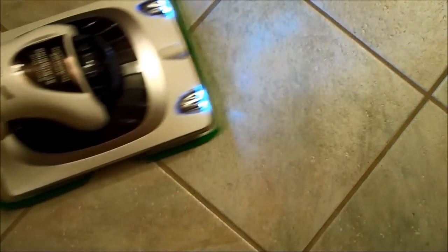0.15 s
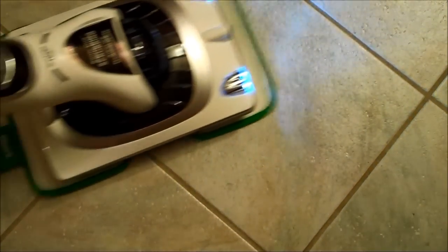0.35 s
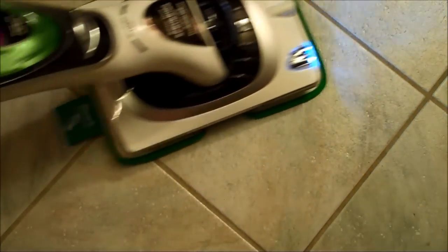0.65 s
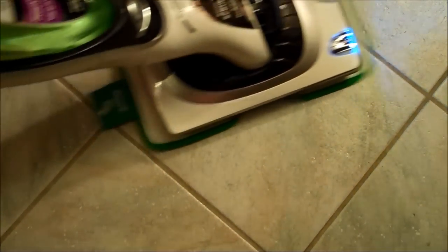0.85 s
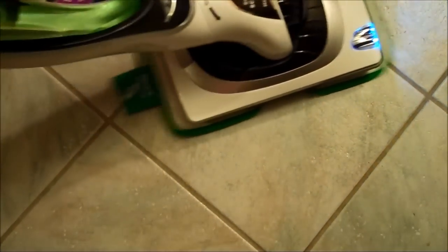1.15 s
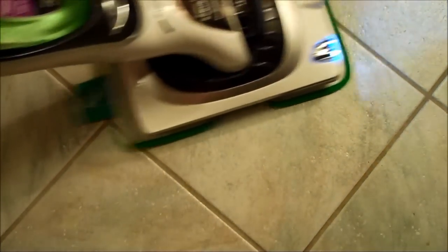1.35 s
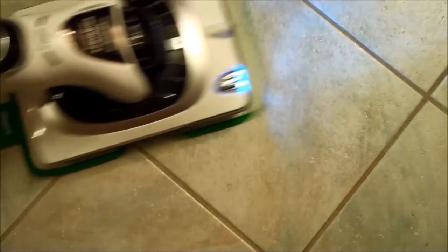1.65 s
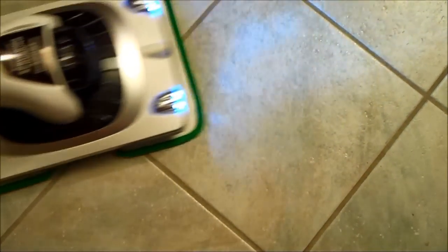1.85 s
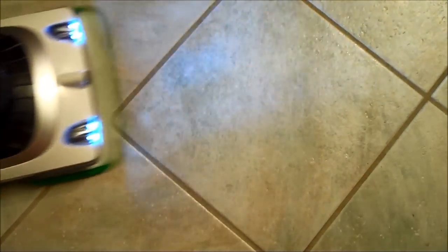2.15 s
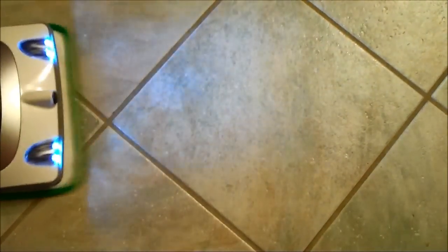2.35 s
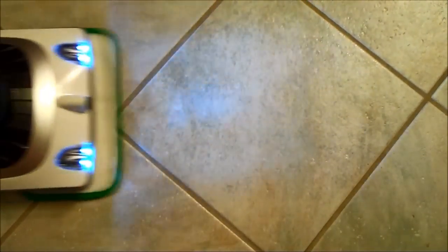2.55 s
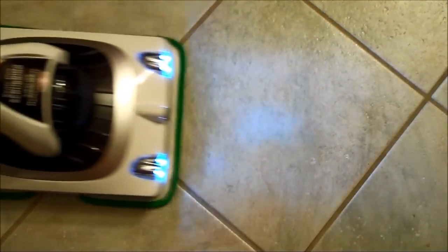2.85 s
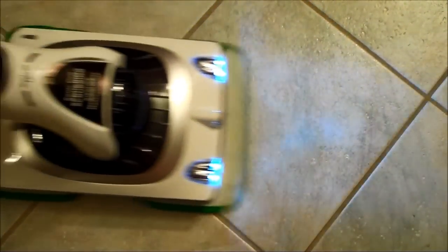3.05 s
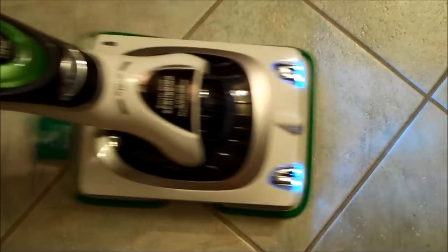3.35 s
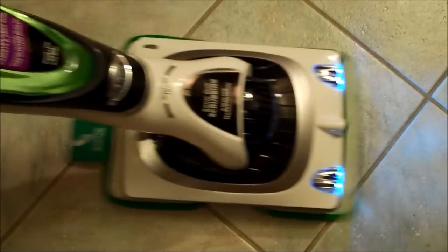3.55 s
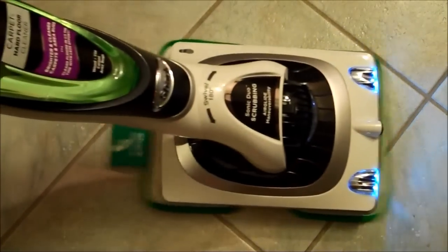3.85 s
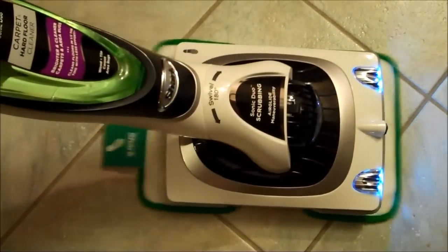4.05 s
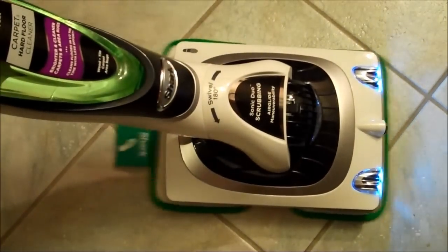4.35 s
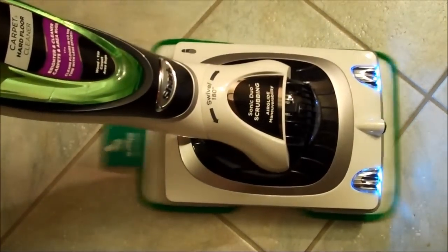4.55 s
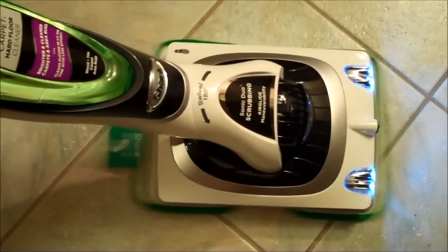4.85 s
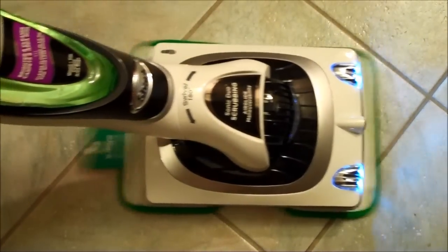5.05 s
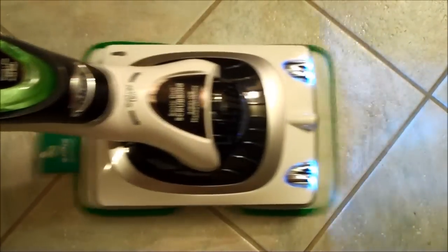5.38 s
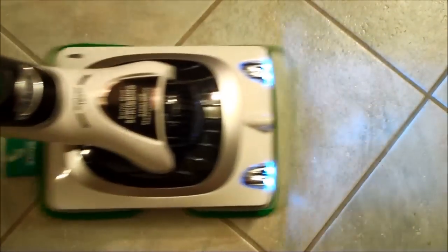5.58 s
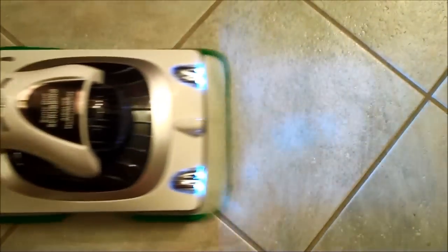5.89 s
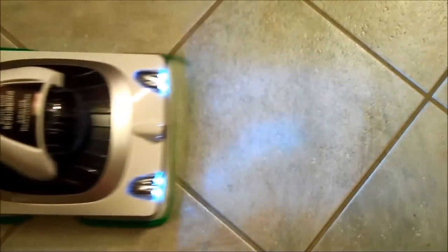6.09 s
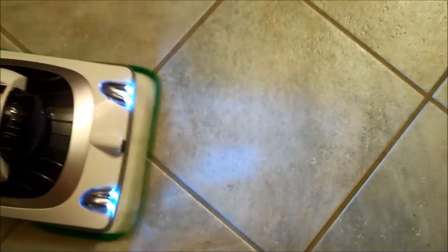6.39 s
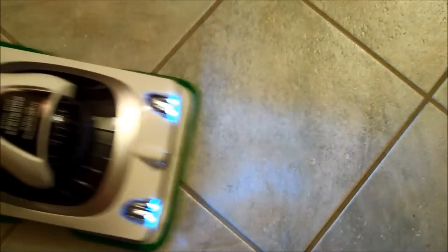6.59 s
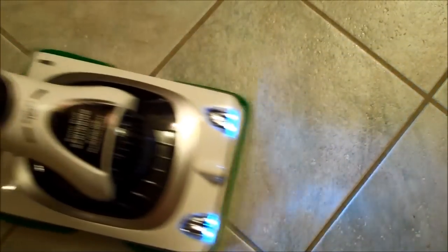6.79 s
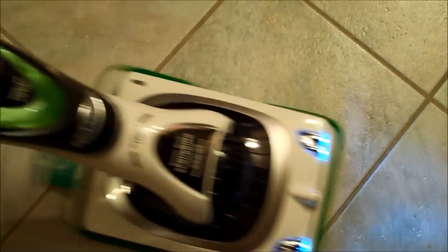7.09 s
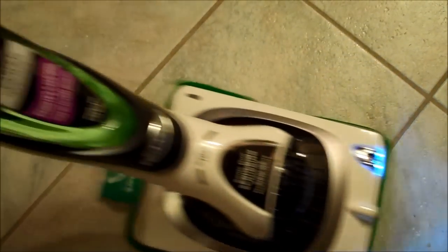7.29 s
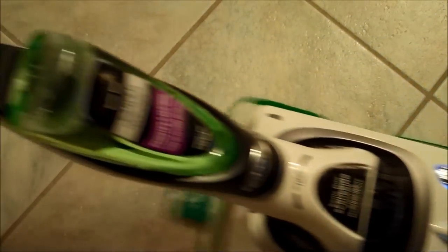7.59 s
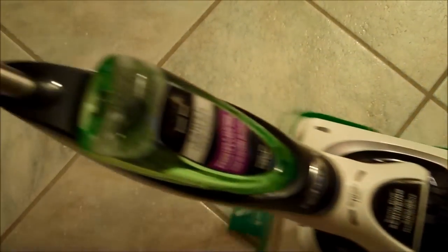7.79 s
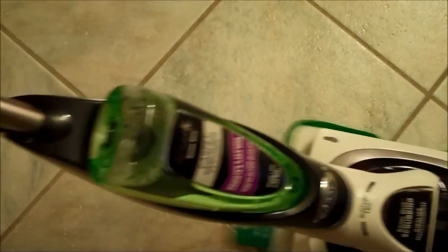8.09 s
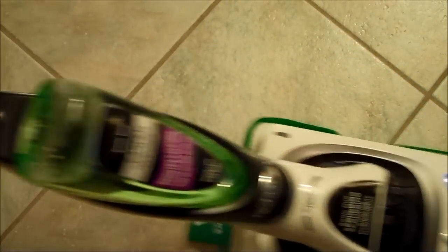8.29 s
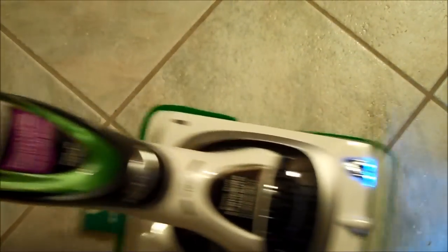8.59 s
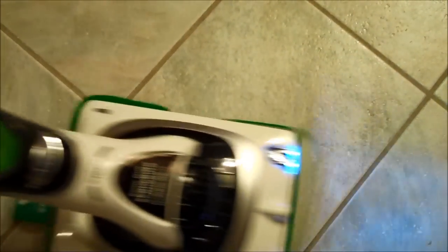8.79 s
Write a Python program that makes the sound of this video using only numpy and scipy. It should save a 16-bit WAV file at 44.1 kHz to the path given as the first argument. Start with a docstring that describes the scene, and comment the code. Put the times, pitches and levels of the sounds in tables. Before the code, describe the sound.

Close up in a reverberant tiled room, an electric scrubber buzzes with a wavering whine around 1.1 kilohertz, over rough friction and thin motor hiss. After a click it glides up to about 1.5 kilohertz, purer and more piercing, pulsing faster, and continues to the end with uneven loudness. A couple of tiny plastic ticks follow.

```python
"""A gear whine is heard first, warbling at the stroke rate above the rub of pads on tiles in a hard room.
A hard-floor scrubber drives two shuttling pads through gear and crank, and each stroke brakes its motor.
A button clicks and the motor spins up to its faster setting. The whine is a tooth tone with harmonics;
rub and motor hiss are coloured noise, clicks are decaying bursts, and late on a faint hum enters."""
import sys
import numpy as np
from scipy import signal
from scipy.fft import rfft, irfft, next_fast_len
from scipy.io import wavfile
from scipy.ndimage import uniform_filter1d, map_coordinates

SR = 44100
rng = np.random.default_rng(int(sys.argv[2]) if len(sys.argv) > 2 else 0)


def store_wav(level_fs):
    """Save 16-bit WAV to argv[1]."""
    pcm = np.round(np.clip(np.atleast_2d(level_fs), -1, 1) * 32767)
    wavfile.write(sys.argv[1], SR, pcm.T.astype(np.int16))


N = 393813
TIME_S = np.arange(N) / SR

# Motor speed, sagging under load and rising after the button.
# Each row: time in seconds, tooth rate in Hz before the swing of each stroke.
MOTOR_SPEED = [(0.0, 1098.8), (0.7, 1110.3), (1.2, 1098.6), (1.7, 1141.7), (2.3, 1115.4), (2.7, 1063.1),
               (3.0, 1118.2), (4.1, 1102.6), (4.55, 1098.4), (4.75, 1276.3), (5.0, 1484.1), (5.15, 1503.2),
               (6.05, 1514.4), (6.65, 1479.7), (7.2, 1498.7), (8.0, 1488.2), (8.4, 1500.5), (8.93, 1518.2)]
# Level of the whine as the machine moves through the room. Each row: time in seconds, tooth tone in dB,
# tooth tone at top speed in dB, tooth tone while braking in dB, octave in dB.
WHINE_LEVELS = [(0, -33, -37, -35, -33), (.4, -33, -28, -29.5, -35), (.7, -29.5, -27, -28, -36.5),
                (1.2, -30, -30, -31, -35), (1.7, -30, -24.5, -36.5, -36), (2.1, -33, -28.5, -31, -32),
                (2.65, -35.5, -33.5, -42, -33.5), (3.2, -32.5, -32, -30, -35),
                (3.7, -30.5, -28.5, -29.5, -33), (4.5, -31.5, -33, -29, -32.5), (4.8, -24.5, -20, -22, -40),
                (5.15, -22.5, -32, -19.5, -37.5), (5.55, -24, -54, -25, -38.5),
                (5.85, -21.5, -30, -26.5, -37.5), (6.4, -30, -31, -37, -41), (6.8, -27, -29, -38, -40),
                (7.05, -22.5, -41, -33, -38.5), (7.3, -28.5, -24, -23, -39),
                (7.8, -22.5, -28.5, -24.5, -36.5), (8.3, -29.5, -27, -24, -36.5),
                (8.55, -22, -37.5, -22.5, -38), (8.8, -25, -18.5, -26, -35),
                (8.93, -26.5, -24, -36.5, -38.5)]
# Tooth tone late in a stroke, relative to its level; rows: bottom speed, recovery.
# Each row: offset at the slow setting in dB, at the fast setting in dB.
TONE_OFFSETS = [(0.1, -1.5), (0.098, 0.5)]
# Octave through a stroke, relative to its level; rows: top speed, braking, bottom speed, recovery.
# Each row: offset at the slow setting in dB, at the fast setting in dB.
OCTAVE_OFFSETS = [(-3.7, -0.9), (-2, -1), (-9, -4), (-8, -1.4)]
# Upper gear orders, before the housing. Each row: multiple of the tooth rate, level at the slow setting
# in dB, level at the fast setting in dB, roughness from 0 to 1.
UPPER_ORDERS = [(3, -49, -54, .85), (4, -58, -51, 1), (5, -58, -58, .8), (6, -55, -51, .7),
                (8, -56, -50, .7), (10, -54, -63, .8)]
# What the housing passes of the upper orders. Each row: frequency in Hz, gain in dB.
HOUSING_GAIN = [(2800, -6), (3050, 3.5), (3250, -0.5), (3500, 1.5), (3750, 7.5), (4000, 7), (4330, 4),
                (4700, -4), (5100, -16), (9000, -11.5), (9450, -13), (10000, -15), (11600, -13),
                (14000, -18)]
# Housing panels that ring on as the whine sweeps through them.
# Each row: resonance in Hz, width in Hz, gain at resonance in dB.
PANEL_MODES = [(1008, 5, -20), (1179, 8.5, -1.5), (2039, 23, -2.5), (2405, 36, 5.5), (3494, 120, -4)]
# Colour of pad scrub and gear rattle. Each row: frequency in Hz, relative level in dB per Hz.
RUB_COLOUR = [(20, -30), (50, -28.5), (105, -32), (135, -23), (300, -15.5), (345, -5.5), (420, -2.5),
              (700, -1), (1150, -2), (1700, -5), (2700, -13.5), (3800, -13.5), (4600, -24), (5200, -29),
              (8000, -77)]
# Resonances of housing and room under the scrub. Each row: frequency in Hz, width in Hz,
# boost at the slow setting in dB, boost at the fast setting in dB (negative for a dip).
RUB_MODES = [(128.6, 6.5, 2, 3), (181, 14, 7.5, 7.5), (249, 26, 9.5, 2), (328, 36, -4.5, -6.5),
             (359.7, 23, 7, 2.5), (383.4, 32, 6, 5.5), (449, 19.3, -6.5, -19), (464, 28, 4.5, 3),
             (592.2, 21, -11.5, -2.5), (615, 34, 9, 6), (799, 17, -5, -9.5), (1301, 74, 10.5, 13),
             (2370, 72, 3, 6), (3381, 50, 10.5, 7), (3823, 68, 6.5, 7), (4260, 160, 0, 5.5),
             (9450, 80, 4, 6.5)]
# Colour of motor brushes and cooling air. Each row: frequency in Hz, relative level in dB per Hz.
HISS_COLOUR = [(1500, -29), (4000, -2.5), (6000, 1), (8500, -1.5), (10200, -4), (11600, 0), (12800, -6),
               (13500, -8), (14000, -28)]
# Plastic clicks of button and handle. Each row: time in seconds, gain in dB,
# decay time of the slower noise (60 dB) in seconds, band centre in Hz.
PLASTIC_CLICKS = [(.377, -38, .02, 8000), (4.3625, -29, .07, 7500), (5.965, -45, .02, 8000),
                  (5.9712, -35, .04, 9000)]
# Ringing modes in every click. Each row: frequency in Hz, relative level in dB, 60 dB decay in seconds.
CLICK_MODES = [(6100, -6, .012), (8800, -4, .008)]
# A short puff of hiss. The one row: centre in seconds, half width in seconds, gain in dB.
HISS_PUFF = (5.985, .045, -50)
# A faint late hum. The one row: start in seconds, end in seconds, fade in seconds, pitch in Hz, level in dB.
FAINT_HUM = (7.5, 9, 0.02, 766.5, -47)
# Reverberation time of the room. Each row: frequency in Hz, 60 dB decay in seconds.
ROOM_DECAY = [(300, 0.424), (1500, 1), (4000, 1), (12000, 0.038)]

# Pairs hold the slow setting's value, then the fast one's.
SPIN_UP_S = (4.55, 5.05)  # start and end of the spin-up
SWING_HZ = (80.68, 61.8)  # scale of the tooth rate's swing in each stroke
RUB_DB, HISS_DB = (-37, -34.5), (-57, -55.5)
TEETH_PER_STROKE, STROKES_AT_START = 94, -.09
DRIFT_DB, DRIFT_KNOTS_PER_S = 1.6, 4  # random drift of the quarter levels given by offsets
UPPER_FOLLOWS, UPPER_REFERENCE_DB = .3, -31  # share of tooth-tone level changes, about this level
ROOM_DB, TOP_HZ = -10, 13950  # gain of the echo; band limit


def stroke_load(angle):
    """Crank loading: each stroke brakes the motor sharply and lets it recover slowly."""
    lagged = angle - .3
    return 1.15 * np.cos(lagged + .5 * (1 - np.cos(lagged))) - .14


def drifting_levels(level_db, offsets, fast):
    """Load-dependent radiation: quarter-stroke levels in dB, each with its own slow random drift."""
    return [level_db + between(pair, fast) + DRIFT_DB * wobble(DRIFT_KNOTS_PER_S) for pair in offsets]


def gear(mean_hz, angle, fast):
    """Gear meshing: tooth impacts make a tone and harmonics, frequency-modulated by the load."""
    tooth_hz = mean_hz + between(SWING_HZ, fast) * stroke_load(angle) + 5 * wobble(40)
    phase = 2 * np.pi * np.cumsum(tooth_hz) / SR
    # the teeth lose contact for a moment as the pads reverse
    slack_db = -6 * np.exp(4 * (np.cos(angle - 1.4) - 1))
    tone_db, top_db, braking_db, octave_db = curves(WHINE_LEVELS)

    tone_quarters = [top_db, braking_db] + drifting_levels(tone_db, TONE_OFFSETS, fast)
    tone_gain = amp(by_quarter(tone_quarters, angle) + .5 * slack_db)
    tone = tone_gain * partial(phase, .4 - .32 * fast, 150)

    octave_quarters = drifting_levels(octave_db, OCTAVE_OFFSETS, fast)
    octave_gain = amp(by_quarter(octave_quarters, angle) + 1.5 * slack_db)
    octave = octave_gain * partial(2 * phase, .55 - .2 * fast, 240)

    upper = np.zeros(N)
    for order, slow_db, fast_db, rough in UPPER_ORDERS:
        level_db = between((slow_db, fast_db), fast) + wobble(30) + .6 * slack_db
        level_db += UPPER_FOLLOWS * (1 - fast) * (tone_db - UPPER_REFERENCE_DB)
        upper += amp(level_db) * partial(order * phase, rough, 110 * order)
    return tone + octave + filtered(upper, lambda hz: amp(along(HOUSING_GAIN, hz)))


def panel_response(hz):
    """Forced resonance: the direct sound plus band-pass modes that store energy and ring on."""
    response = 1
    for centre, width, db in PANEL_MODES:
        damping = 1j * hz * width
        response = response + amp(db) * damping / (centre ** 2 - hz ** 2 + damping)
    return response


def pad_rub(angle, fast):
    """Sliding friction: broadband noise coloured by resonances, swelling with each stroke."""
    def colour_db(hz, boost_column):
        modes_db = sum(row[boost_column] / (1 + (2 * (hz - row[0]) / row[1]) ** 2) for row in RUB_MODES)
        return along(RUB_COLOUR, hz) + modes_db

    slow_rub = rush(lambda hz: colour_db(hz, 2), patchy_db=1.5)
    fast_rub = rush(lambda hz: colour_db(hz, 3), patchy_db=1.5)
    rub = np.sqrt(1 - fast) * slow_rub + np.sqrt(fast) * fast_rub  # equal-power crossfade
    return amp(between(RUB_DB, fast) + 0.24 * np.cos(angle + 1.2)) * rub


def motor_hiss(angle, fast):
    """Turbulence and brush friction: treble noise whose level follows the stroke."""
    swing_db = between((.4, 1.2), fast) * np.cos(angle + 0.17)
    return amp(between(HISS_DB, fast) + swing_db) * rush(lambda hz: along(HISS_COLOUR, hz), patchy_db=1.55)


def clicks():
    """Impact excitation: hard plastic answers with decaying modes and a crack of noise."""
    out, t = np.zeros(N + SR), np.arange(SR // 5) / SR
    for start, db, t60, centre_hz in PLASTIC_CLICKS:
        ring = sum(amp(level - 60 * t / decay) * np.sin(2 * np.pi * hz * t)
                   for hz, level, decay in CLICK_MODES)
        decay_gain = amp(-60 * t / 0.0047) + 0.43 * amp(-60 * t / t60)
        crack = decay_gain * rng.standard_normal(len(t))
        band = signal.butter(N=1, Wn=[.6 * centre_hz, 1.4 * centre_hz], btype="band", fs=SR)
        first = round(start * SR)
        out[first:first + len(t)] += amp(db) * signal.lfilter(*band, ring + crack)
    return out[:N]


def puff():
    """Amplitude-modulated noise: a bell-shaped envelope makes one brief puff of hiss."""
    centre, half_width, db = HISS_PUFF
    return amp(db) * np.exp(-((TIME_S - centre) / half_width) ** 2) * rng.standard_normal(N)


def hum():
    """Narrow-band noise: random modulation of a carrier gives an unsteady hum that fades in late."""
    start, end, fade, hz, db = FAINT_HUM
    envelope = np.clip(np.minimum(TIME_S - start, end - TIME_S) / fade, 0, 1)
    return amp(db) * envelope * partial(2 * np.pi * hz * TIME_S, 1, 25)


def room(x, hop=SR // 2):
    """Reverberation: decaying noise tails, a new one each half second as the machine keeps moving."""
    out, fade = np.zeros(N + 3 * SR), np.hanning(2 * hop)
    x = np.pad(x, (hop, 2 * hop))
    for start in range(0, N + hop, hop):
        hz, t, z = signal.stft(rng.standard_normal(SR // 2), SR, nperseg=256)
        decay = amp(-60 * t / along(ROOM_DECAY, hz)[:, None])
        tail = signal.istft(z * decay, SR, nperseg=256)[1]
        wet = signal.fftconvolve(x[start:start + 2 * hop] * fade, tail / np.linalg.norm(tail))
        out[start:start + len(wet)] += wet
    return out[hop:hop + N]


def partial(phase, rough, blur_rate):
    """Spectral broadening: a tone of rms 1, its rough share smeared into a narrow band of noise."""
    rough = np.clip(rough, 0, 1)
    smear = unit(wobble(blur_rate) * np.cos(phase) + wobble(blur_rate) * np.sin(phase))
    return np.sqrt(2 * (1 - rough)) * np.sin(phase) + np.sqrt(rough) * smear


def by_quarter(levels_db, angle):
    """Harmonic interpolation: a smooth loop through one level at each quarter of the stroke."""
    top, braking, bottom, recovery = levels_db
    even, odd = (top + bottom) / 2, (braking + recovery) / 2
    return ((even + odd) / 2 + (even - odd) / 2 * np.cos(2 * angle)
            + (top - bottom) / 2 * np.cos(angle) + (braking - recovery) / 2 * np.sin(angle))


def rush(colour_db, patchy_db):
    """Spectral shaping: coloured noise of rms 1, with random gain patches in time and frequency."""
    z = signal.stft(rng.standard_normal(N), nperseg=512)[2]
    field = uniform_filter1d(rng.standard_normal(z.shape), size=6, axis=0)
    field = uniform_filter1d(field, size=10, axis=1)
    noise = signal.istft(z * amp(patchy_db * unit(field)), nperseg=512)[1][:N]
    return unit(filtered(noise, lambda hz: amp(colour_db(hz))))


def filtered(x, response):
    """Linear filtering: the spectrum of x times a response of frequency."""
    m = next_fast_len(N + SR // 2)
    return irfft(rfft(x, m) * response(np.fft.rfftfreq(m, 1 / SR)), m)[..., :N]


def wobble(rate):
    """Random modulation: straight lines between random knots, rate knots a second."""
    knots = rng.standard_normal(int(N * rate / SR) + 4)
    return map_coordinates(knots, [np.arange(N) * rate / SR], order=1)


def curves(rows):
    """Linear interpolation in time: one value per sample for each column after the time."""
    s, *columns = np.transpose(rows)
    return [np.interp(TIME_S, s, column) for column in columns]


def along(points, hz):
    """Logarithmic frequency scale: interpolates (Hz, value) points on a log axis."""
    f, v = np.transpose(points)
    return np.interp(np.log(hz + 1), np.log(f + 1), v)


def between(pair, fast):
    """Linear blend from the slow setting's value to the fast one's."""
    return pair[0] + (pair[1] - pair[0]) * fast


def amp(db):
    """Decibel scale: level in dB to amplitude gain."""
    return 10 ** (np.asarray(db) / 20)


def unit(x):
    """Power normalization: scales x to rms 1."""
    return x / np.sqrt(np.mean(x ** 2) + 1e-20)


def scene():
    """Superposition: whine, clicks and puff with their echo, plus rub, hiss and hum without it."""
    mean_hz, = curves(MOTOR_SPEED)
    angle = 2 * np.pi * (STROKES_AT_START + np.cumsum(mean_hz) / SR / TEETH_PER_STROKE)
    fast = np.interp(TIME_S, SPIN_UP_S, (0, 1))  # 0 at the slow setting, 1 at the fast
    whine = filtered(gear(mean_hz, angle, fast), panel_response)
    # a high-pass near 4 kHz leaves only treble
    treble = filtered(clicks() + puff(), lambda hz: 1 / (1 + (4000 / (hz + 1)) ** 4))
    near = whine + treble
    machine = near + amp(ROOM_DB) * room(near) + pad_rub(angle, fast) + motor_hiss(angle, fast)
    return (machine + hum())[None]


def record(dry):
    """Band limitation: the camera keeps nothing at or above its top frequency."""
    return filtered(dry, lambda hz: hz < TOP_HZ)


dry = scene()
out = record(dry)
store_wav(out)
```